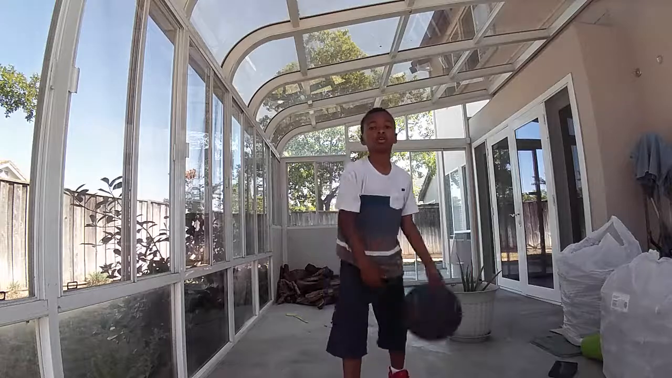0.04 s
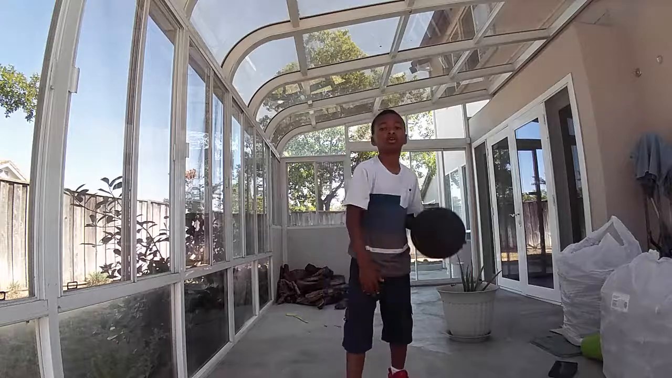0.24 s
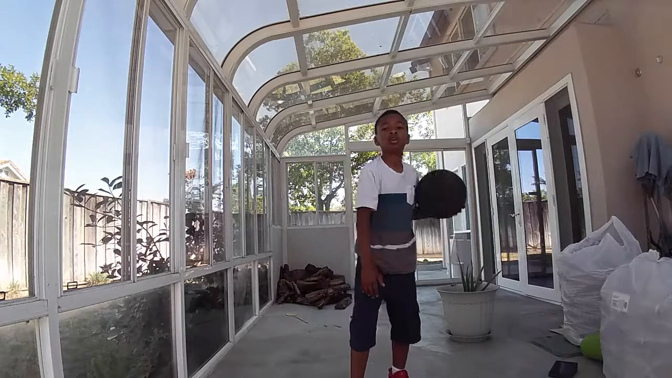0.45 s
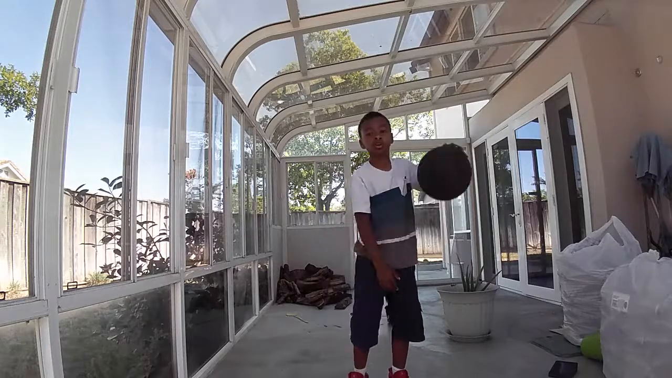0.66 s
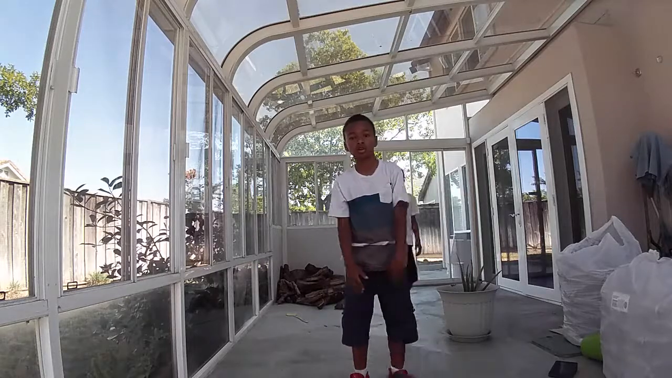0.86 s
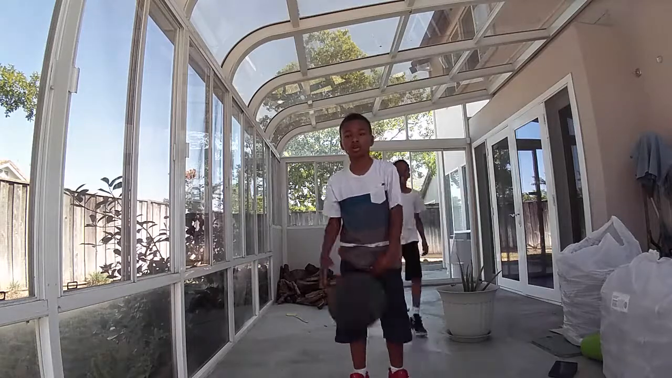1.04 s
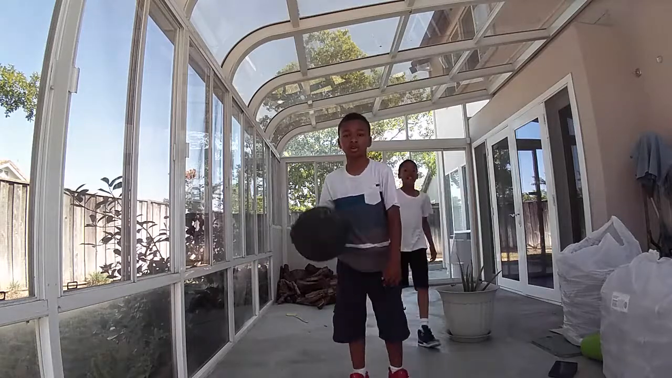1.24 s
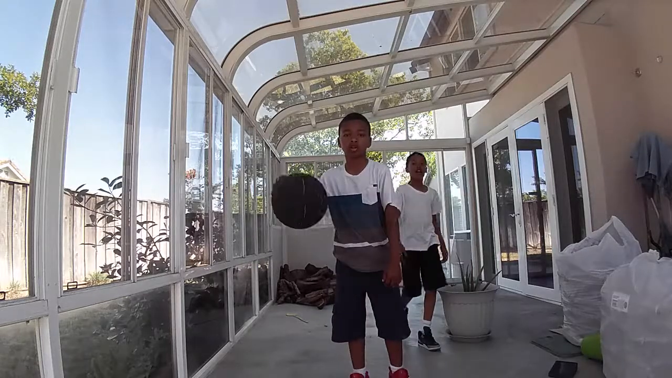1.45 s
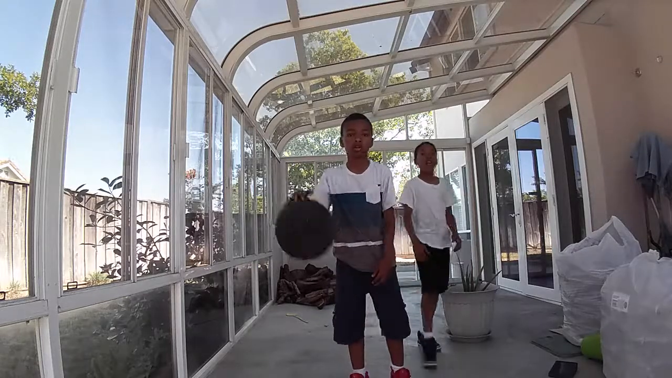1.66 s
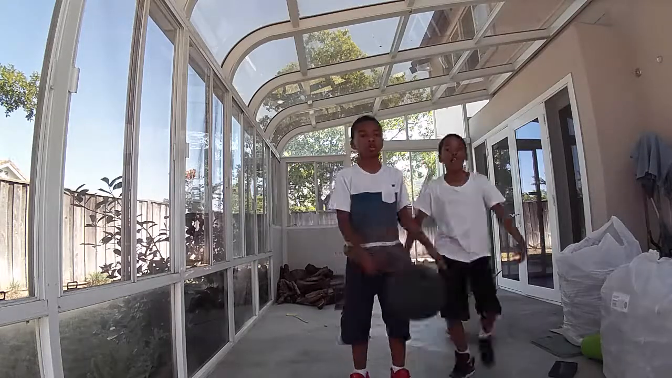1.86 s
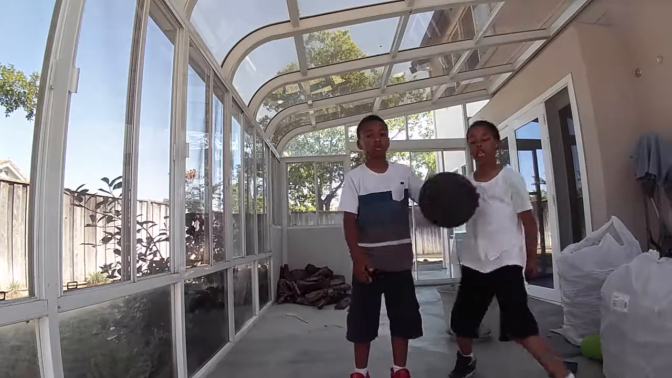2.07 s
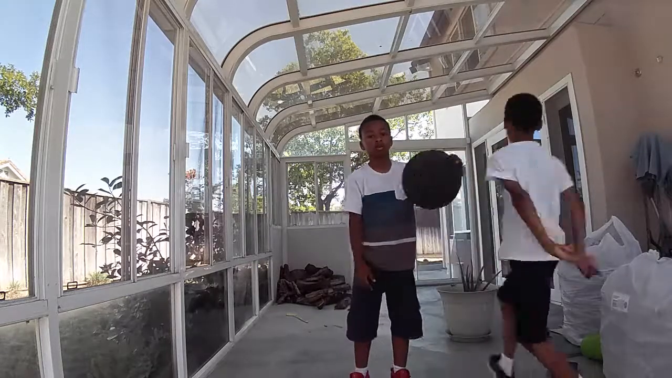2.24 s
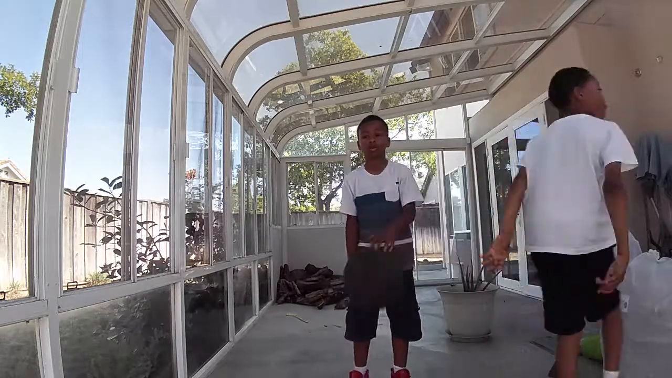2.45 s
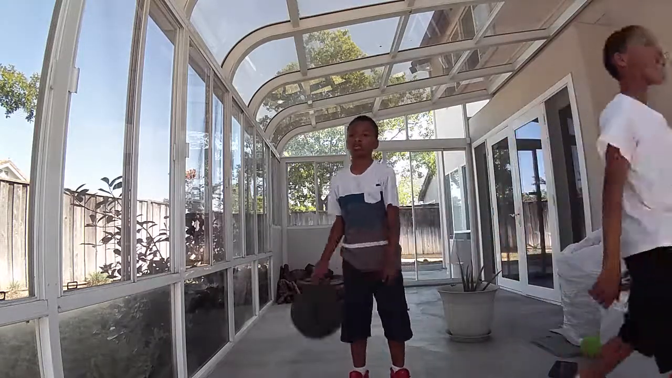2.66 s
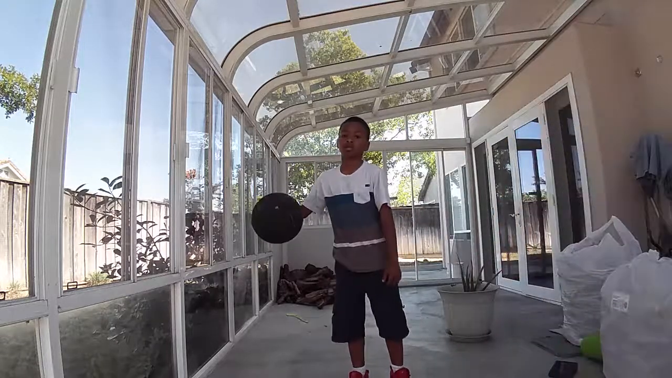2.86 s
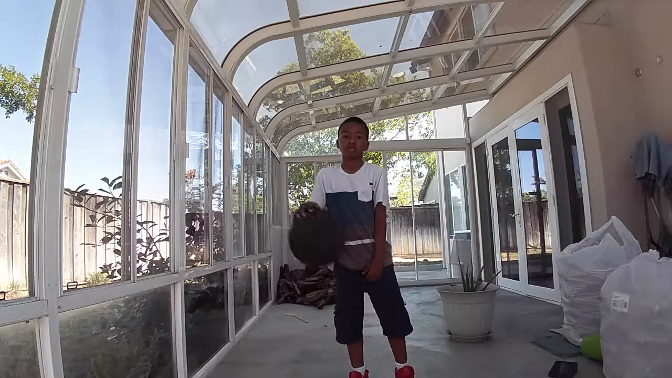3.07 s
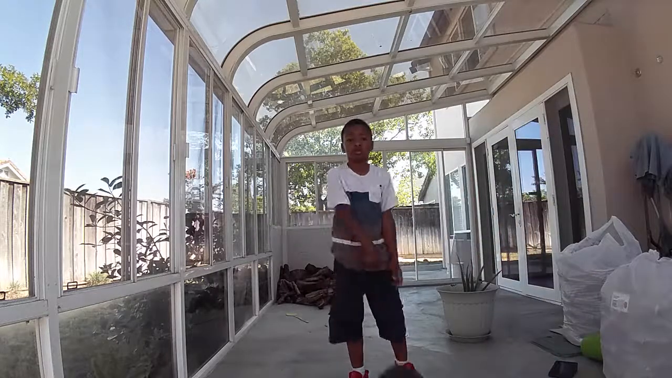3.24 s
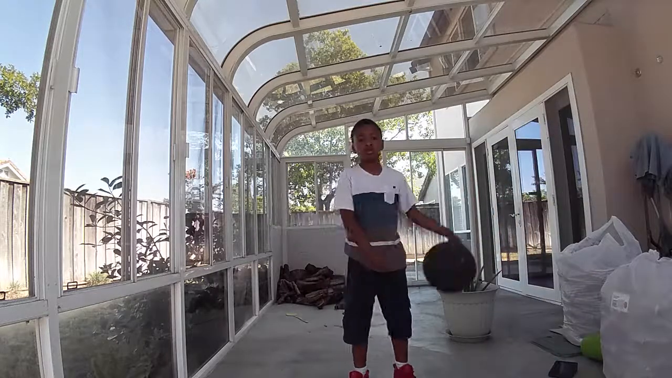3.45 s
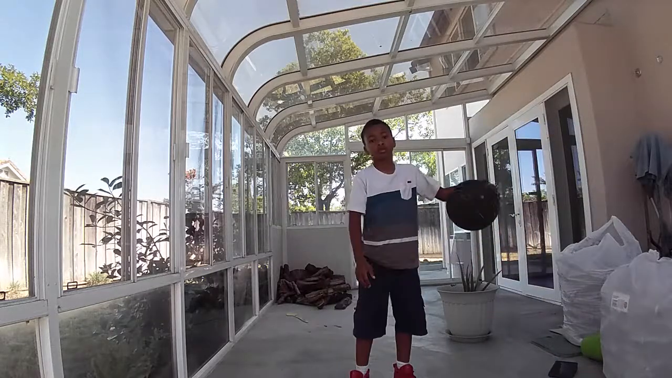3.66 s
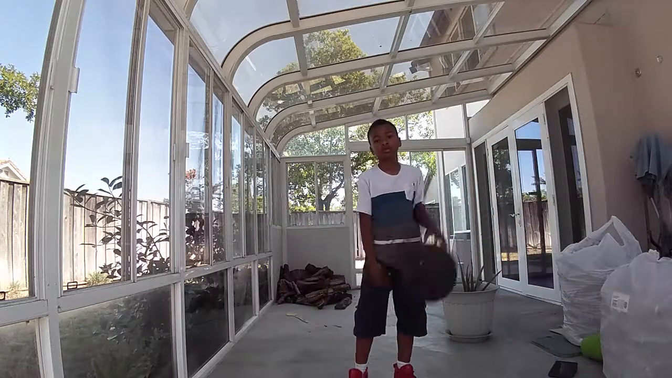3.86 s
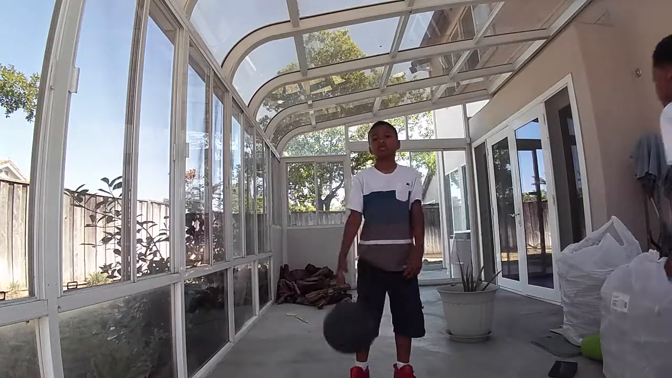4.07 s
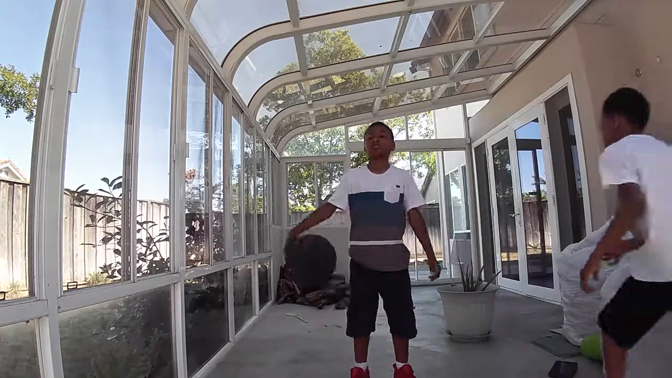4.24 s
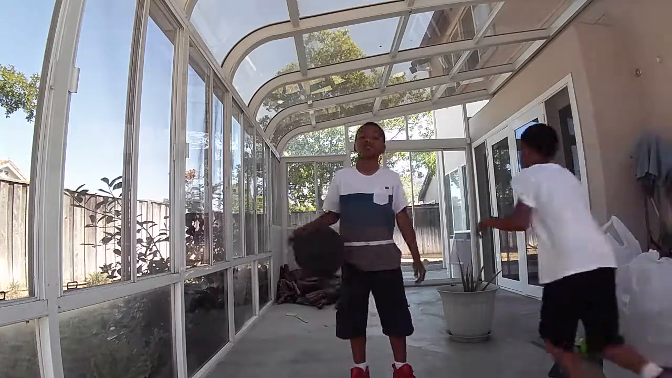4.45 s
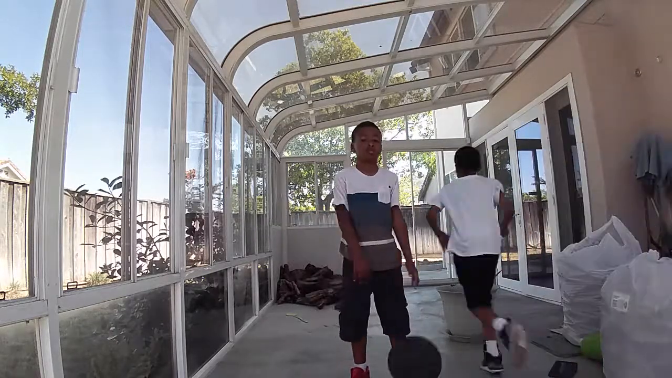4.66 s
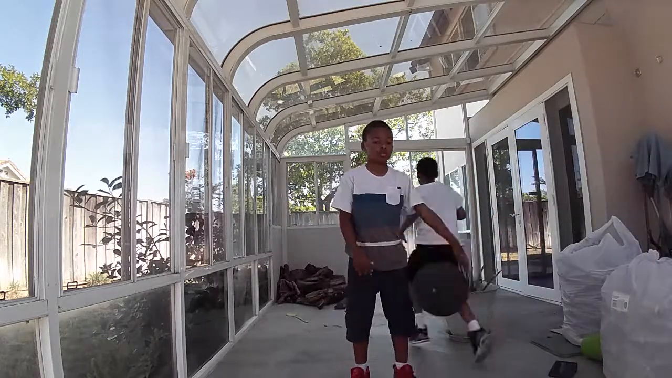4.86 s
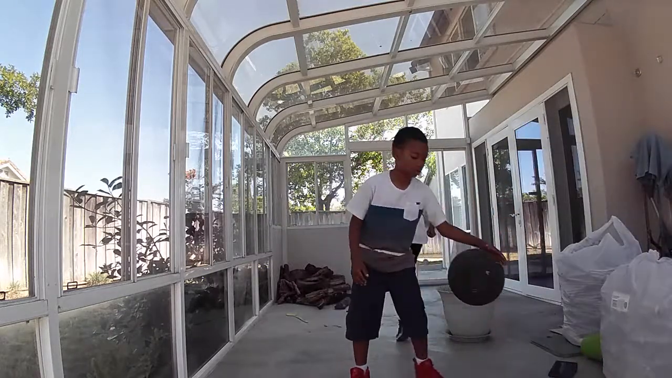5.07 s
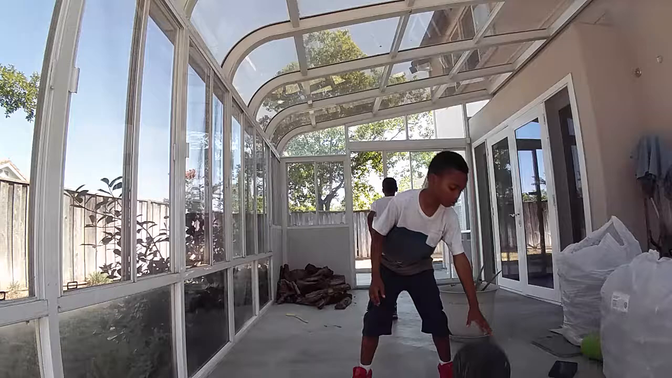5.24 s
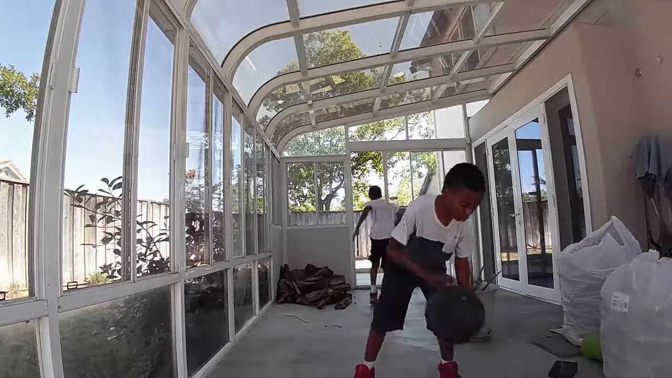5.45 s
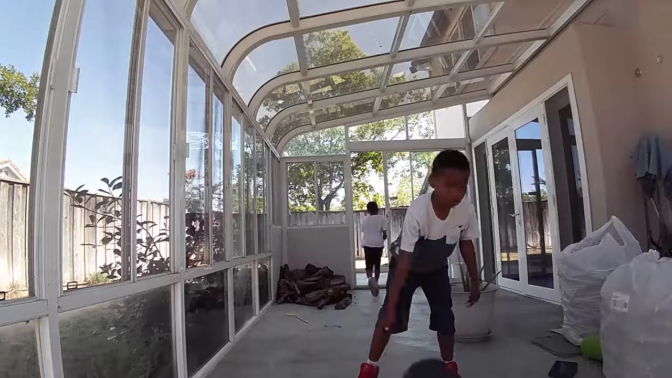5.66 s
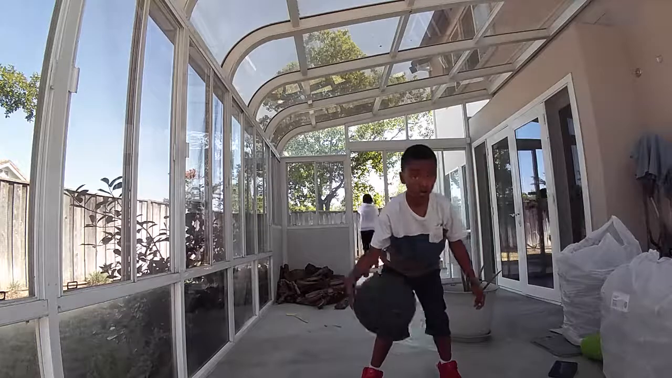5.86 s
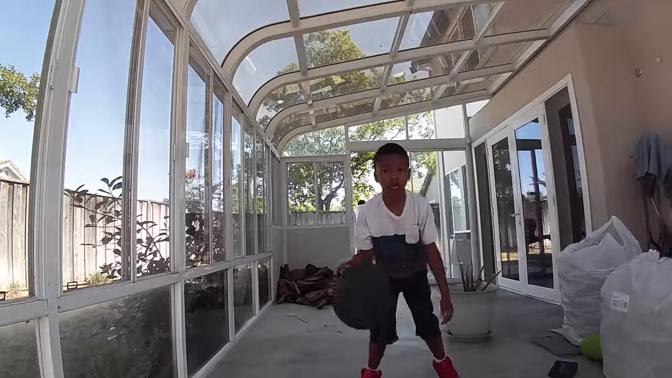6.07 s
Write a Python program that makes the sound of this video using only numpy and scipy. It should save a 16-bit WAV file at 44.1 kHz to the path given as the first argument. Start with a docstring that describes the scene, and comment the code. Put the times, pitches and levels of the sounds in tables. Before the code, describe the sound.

A basketball bounces on concrete in a narrow glass sunroom, close to a stereo camera microphone. Each hit is a bright double crack with a bassy thump and a short hollow ring, roughly every three quarters of a second, quickening at the end. Between hits, palms pat the rubber and shoes scuff the floor. Faint falling chirps occur early over a low steady rumble.

```python
"""Dribbling a basketball in a glass sunroom

A basketball is dribbled on the concrete floor of a narrow glass sunroom, close to a camera's two microphones.
Each bounce is a double crack, a slap of the rubber shell and a thump that sets the room's air modes booming.
Between bounces palms catch the ball crisply or push it down softly, and shoes scuff: short strokes are brighter.
Faint falling chirps come over a low steady rumble. Clicks, shaped noise and decaying sines make the sounds."""
import sys
import numpy as np
from scipy import signal
from scipy.fft import rfft, irfft, next_fast_len
from scipy.io import wavfile
from scipy.ndimage import uniform_filter1d

SR = 44100
rng = np.random.default_rng(int(sys.argv[2]) if len(sys.argv) > 2 else 0)


def inscribe(sig):
    """Save sig as 16-bit PCM at rate SR to the path in sys.argv[1].

    A 1-D sig is mono; a 2-D sig holds one channel per row.
    Samples are clipped to [-1, 1] before scaling.
    """
    pcm = np.round(np.clip(np.atleast_2d(sig).T, -1, 1) * 32767)
    wavfile.write(sys.argv[1], SR, pcm.astype(np.int16))


N = 269362

# ball on the floor: (time [s], slap level [dB, relative], treble [dB], shell resonance [Hz],
# height of that resonance [dB], height of the upper resonance [dB])
BOUNCE_HITS = [(-.085, -17.5, -2, 785, 8, 4), (0.8711, -15, -3, 959, 7, 4.5),
               (1.5923, -17, -6.5, 770, 5.5, 3), (2.4172, -16.5, -2, 714, 6, 3),
               (3.2393, -16.5, -2, 863, 9, 0.5), (3.978, -16, -2, 819, 4.5, 7),
               (4.661, -18.5, -4.5, 850, 3, 4.5), (5.2628, -20.5, -0.5, 944, 4.5, 3.5),
               (5.6396, -19, -3, 801, 7.5, 8)]
# spectrum of ball slaps: (frequency [Hz], level [dB per Hz, relative])
SLAP_SPECTRUM = [(100, -5), (200, -10), (300, -7.5), (410, -8), (495, -20.5), (600, -4), (850, -1),
                 (1230, -9), (1700, -15), (3000, -14.5), (5300, -17.5), (7300, -16.5), (12000, -23),
                 (16000, -35)]
# spectrum of soles on concrete: (frequency [Hz], level [dB per Hz, relative])
SCUFF_SPECTRUM = [(150, -16), (450, -18.5), (700, -1.5), (1600, -3), (3700, -5.5), (7100, -1.5),
                  (11000, -5.5), (16000, -12)]
# reverberation time of the glass room: (frequency [Hz], time to fall 60 dB [s])
ROOM_DECAY = [(150, 0.87), (400, 0.79), (850, 0.63), (2700, 0.75), (7000, 0.65), (11000, 0.51),
              (16000, 0.3)]

T = np.arange(SR) / SR  # time within one event [s]
HZ = np.fft.rfftfreq(SR, 1 / SR)


def amp(db):
    """Decibels to gain."""
    return 10 ** (np.asarray(db) / 20)


def unit(x):
    """x at rms 1."""
    return x / np.sqrt(np.mean(x ** 2) + 1e-20)


def along(points, hz):
    """(Hz, value) points read on a log frequency axis."""
    point_hz, values = np.transpose(points)
    return np.interp(np.log(hz + 1), np.log(point_hz + 1), values)


def add(track, s, sound):
    """Mix a sound into the track from time s on, cut off at either end of the track."""
    start = round(s * SR)
    part = sound[..., max(-start, 0):N - start]
    first = max(start, 0)
    track[:, first:first + part.shape[-1]] += part


def bell(centre_hz, octaves):
    """A bump of height 1 on the frequency axis."""
    return np.exp(-.5 * (np.log2((HZ + 1) / centre_hz) / octaves) ** 2)


def treble(corner_hz=3000):
    """A shelf that rises from 0 to 1 around the corner."""
    return HZ ** 4 / (HZ ** 4 + corner_hz ** 4)


def diffuse(colour_db, size=SR):
    """Coloured noise arriving from all sides at two close microphones, rms 1."""
    # left-right correlation of the noise, wide in the treble, nearly mono at the very top:
    # (frequency [Hz], correlation [-1 to 1])
    correlation = [(100, 0.9), (250, 0.94), (500, 0.91), (1000, 0.53), (2000, 0.4), (4000, 0.28),
                   (8000, 0.037), (13000, 0.9)]
    # balance of the two microphones: (frequency [Hz], left minus right [dB])
    lean = [(150, 1), (500, 0.5), (1000, 3), (2000, 3.1), (4000, 0.5), (8000, -4), (12000, 2.5)]
    hz = np.fft.rfftfreq(size, 1 / SR)
    turn = np.arccos(np.clip(along(correlation, hz), -1, 1)) / 2  # shares out mid and side
    mid, side = rfft(rng.standard_normal((2, size))) * [np.cos(turn), np.sin(turn)]
    balance = amp(np.outer([.5, -.5], along(lean, hz)))
    spectra = np.array([mid + side, mid - side]) * balance * amp(colour_db)
    return unit(irfft(spectra, size))


def reverberation(colour_db):
    """The glass room's answer to a click of this colour: each frequency dies at its own speed."""
    hz, t, z = signal.stft(diffuse(colour_db), SR, nperseg=256)
    decay = amp(-60 * t / along(ROOM_DECAY, hz)[:, None])
    return signal.istft(z * decay, SR, nperseg=256)[1][:, :SR]


def room_swell(colour_db, length):
    """A steady sound of this length fills the room, which then rings out; gain peaks at 1 on rms 1 noise."""
    hz, t, z = signal.stft(diffuse(colour_db), SR, nperseg=256)
    t60 = along(ROOM_DECAY, hz)[:, None]
    filled = 1 - amp(-60 * np.minimum(t, length) / t60) ** 2  # energy built up so far
    ring_out = amp(-60 * np.maximum(t - length, 0) / t60)
    gain = np.sqrt(filled / filled[:, -1:]) * ring_out
    return signal.istft(z * gain, SR, nperseg=256)[1][:, :SR]


def click(colour_db):
    """A causal impulse of this colour, energy 1: folding the cepstrum puts its energy first."""
    cepstrum = irfft(np.log(amp(colour_db) + 1e-6))
    fold = np.r_[1, np.full(SR // 2 - 1, 2), np.zeros(SR - SR // 2)]
    pulse = irfft(np.exp(rfft(cepstrum * fold)))
    return pulse / np.linalg.norm(pulse)


def ring(modes, scatter_db):
    """Damped modes struck together, each at a slightly new strength."""
    total = 0
    for hz, db, t60 in modes:
        strength = amp(db + scatter_db * rng.normal() - 60 * T / t60)
        total = total + strength * np.sin(2 * np.pi * hz * T)
    return total


def boom(rise=0.004, low_hz=65):
    """The room's low modes swell as the ball squashes; a high-pass keeps the deepest bass out of the boom."""
    # air modes of the room: (frequency [Hz], level [dB, relative], time to fall 60 dB [s])
    room_modes = [(57.5, -12.5, 0.8), (58.4, -4.5, 0.22), (69.34, -12.5, 0.53), (86, -6, 0.21),
                  (93.2, -22, 0.51), (100.2, -15.5, 0.37), (107, -34.5, 0.9), (126.2, -18.5, 0.52),
                  (137.6, -27, 0.6), (143.3, -26.5, 0.52), (152.8, -27, 0.57), (170, -70, 0.66),
                  (223.8, -25.5, 0.63), (236.8, -26.5, 0.9), (247.5, -33, 0.48), (284.2, -31.5, 0.73),
                  (358.5, -43, 0.97)]
    air = -ring(room_modes, scatter_db=3.0) * (1 - np.exp(-T / rise))
    return signal.sosfilt(signal.butter(6, low_hz, "high", fs=SR, output="sos"), air)


def background(db=-52):
    """Steady low rumble and faint hiss in the room, as shaped noise."""
    # background spectrum: (frequency [Hz], level [dB per Hz, relative])
    rumble = [(25, -52), (45, -16), (58, -16.5), (80, -9.5), (150, -23.5), (240, -18), (480, -40.5),
              (800, -23.5), (1600, -34), (6700, -43.5), (16000, -46)]
    return amp(db) * diffuse(along(rumble, np.fft.rfftfreq(N, 1 / SR)), size=N)


def chirps(waver_hz=120):
    """Thin, wavering whistles that glide down, blurred by the room."""
    # faint chirps: (time [s], length [s], start pitch [Hz], end pitch [Hz], level [dB, relative])
    calls = [(.66, 0.14, 5650, 4930, -67), (1.293, 0.12, 2230, 2060, -51), (1.315, 0.125, 2880, 2800, -57)]
    out = np.zeros((2, N))
    for s, length, start_hz, end_hz, db in calls:
        progress = np.clip(T / length, 0, 1)
        waver = unit(uniform_filter1d(rng.standard_normal(SR), size=150))
        pitch = start_hz + (end_hz - start_hz) * progress + waver_hz * waver
        swell = np.sqrt(progress * (1 - progress))
        tone = swell * np.sin(2 * np.pi * np.cumsum(pitch) / SR)
        room = reverberation(along(SCUFF_SPECTRUM, HZ))
        wet = signal.fftconvolve(tone[None], room, axes=1)[:, :SR]
        add(out, s, amp(db) * (tone + wet / np.std(wet[:, T < length])))
    return out


def slide(length, body_db, grit=0.29, edge=0.0066, direct_db=-5):
    """A sliding sole or palm makes a dense train of tiny slips that the room smears."""
    plain_s = 0.059  # a stroke this long has the plain spectrum
    treble_db_per_halving, plain_rise_s = 4, .011  # shorter is brighter; time constant of a plain stroke's swell
    stroke = np.clip(np.minimum(T, length + edge - T) / edge, 0, 1)
    treble_db = treble_db_per_halving * np.log2(plain_s / length)
    # body_db lifts the low middle
    colour = along(SCUFF_SPECTRUM, HZ) + treble_db * treble() + body_db * bell(650, octaves=0.66)
    grains = np.exp(grit * unit(uniform_filter1d(rng.standard_normal(SR), size=30)))
    slips = stroke * unit(grains * diffuse(colour))
    pressure = 1 - np.exp(-T / (plain_rise_s * (length / plain_s) ** 2))  # long strokes start gently
    return pressure * (amp(direct_db) * slips + room_swell(colour, length))


def scuffs():
    """Soles scrape the concrete, and once a palm rubs the hollow ball."""
    # soles sliding on concrete: (time [s], length [s], level [dB, relative])
    strokes = [(0.665, 0.29, -51), (1.09, 0.022, -43.5), (1.172, 0.19, -45.5), (1.466, 0.021, -35.5),
               (1.9, 0.069, -44.5), (2.1, 0.085, -43), (2.175, 0.065, -37.5), (2.851, 0.027, -23.5),
               (2.88, 0.037, -38.5), (3.113, 0.091, -42), (4.273, 0.037, -37.5), (4.628, 0.043, -29.5),
               (4.897, 0.026, -34), (5.079, 0.064, -41), (5.122, 0.018, -37.5), (5.14, 0.03, -30.5)]
    # one palm sliding on the ball: time [s], length [s], level [dB, relative]
    palm_rub = (1.453, 0.134, -38)
    out = np.zeros((2, N))
    for s, length, db in strokes:
        add(out, s, amp(db) * slide(length, body_db=0))
    s, length, db = palm_rub
    add(out, s, amp(db) * slide(length, body_db=24))  # the ball rings hollow under the palm
    return out


def rising(s):
    """The ball is on its way up when the nearest bounce lies behind it."""
    nearest = min((row[0] for row in BOUNCE_HITS), key=lambda hit: abs(hit - s))
    return nearest < s


def pats(wall_delay=0.02, smack_db=23, room_db=4.0):
    """A palm smacks the shell, which rings briefly and thuds; the nearest wall answers."""
    # palms meeting the ball: (time [s], slap level [dB, relative], shell resonance [Hz])
    touches = [(0.286, -46.5, 790), (.563, -64, 690), (0.845, -47.5, 930), (1.453, -43, 740),
               (1.899, -42.5, 1200), (3.109, -37.5, 1120), (3.784, -38, 1580), (3.957, -43, 1000),
               (4.297, -35.5, 866), (4.901, -39.5, 2440), (5.124, -38, 790), (5.447, -34, 1920)]
    catch_treble_db, push_treble_db = -0.5, -6.5  # a rising ball smacks the palm; a push is softer
    thud_db = 7  # relative to the slap level
    out = np.zeros((2, N))
    for s, slap_db, shell_hz in touches:
        treble_db = catch_treble_db if rising(s) else push_treble_db
        colour = along(SLAP_SPECTRUM, HZ) + 3 * bell(1550, octaves=0.35) + treble_db * treble()
        ringing = colour + 10 * bell(shell_hz, octaves=0.3)
        smack = amp(smack_db) * click(colour)
        shell = amp(10 - 60 * T / .04) * diffuse(ringing)
        room = amp(room_db) * reverberation(colour + 6 * bell(shell_hz, octaves=0.33))
        add(out, s, amp(slap_db) * (smack + shell + room))
        add(out, s + wall_delay, amp(slap_db - 1 - 60 * T / 0.089) * diffuse(ringing))
        add(out, s, amp(slap_db + thud_db) * boom())
    return out


def shell_tone(shell_hz, width_hz=24, t60=0.69):
    """The shell's narrow ring, which the room keeps alive after the slap."""
    narrow = -20 * np.log10(1 + ((HZ - shell_hz) / width_hz) ** 2)
    return diffuse(narrow) * amp(-60 * T / t60) * (1 - np.exp(-T / 0.0043))


def bounces(crack_delay=.0024, wall_delay=0.013, thump_db=1.5):
    """First contact, a sharper crack as the shell flattens, then wall echo, ringing and room."""
    # air cavity of the ball: (frequency [Hz], level [dB, relative], time to fall 60 dB before slap damping [s])
    cavity = [(959, -3, .5), (1615, -12, .5), (1767, -14, .5), (2153, -12, .5), (2993, -20, .5)]
    upper_hz = 1188  # the shell's upper resonance
    # a bounce duller than crisp knocks harder in the middle
    crisp_treble_db, knock_hz, knock_db_per_db = -2, 1760, 1.5
    # the dribble gets low and quick from here on [s], and quick bounces die sooner [dB per s]
    quick_from_s, easy_damping, quick_damping = 4.5, 5, 17
    out = np.zeros((2, N))
    typical_db = np.mean([row[1] for row in BOUNCE_HITS])
    for s, slap_db, treble_db, shell_hz, shell_db, upper_db in BOUNCE_HITS:
        knock_db = knock_db_per_db * (crisp_treble_db - treble_db)
        colour = along(SLAP_SPECTRUM, HZ) + treble_db * treble()
        colour += shell_db * bell(shell_hz, octaves=0.11)
        colour += upper_db * bell(upper_hz, octaves=0.23)
        colour += knock_db * bell(knock_hz, octaves=0.36)
        damping = quick_damping if s > quick_from_s else easy_damping
        slap = amp(slap_db - damping * T)

        contact = click(colour + 8 * bell(280, octaves=0.99))
        add(out, s, -slap * amp(24.0) * contact)
        crack = click(colour + 15 * treble())
        add(out, s + crack_delay, -slap * amp(21) * crack)
        grind = amp(2.5 - 60 * T / 0.029) * diffuse(colour + 7 * treble())  # rubber grinding on grit
        add(out, s, slap * grind)
        add(out, s + crack_delay, slap * amp(12.0 - 60 * T / 0.028) * diffuse(colour))  # body of the slap
        add(out, s + wall_delay, slap * amp(1.0 - 60 * T / 0.017) * diffuse(colour))
        room = reverberation(colour) * (1 - np.exp(-T / .007))
        add(out, s, slap * amp(5.5) * room)
        add(out, s, slap * amp(shell_db - 12.0) * shell_tone(shell_hz))
        add(out, s, slap * amp(-10) * ring(cavity, scatter_db=2))
        # the thump varies less than the slap
        add(out, s, amp(thump_db + 0.66 * (slap_db - typical_db)) * boom())
    return out


def scene():
    """Everything at the two microphones."""
    return background() + chirps() + scuffs() + pats() + bounces()


def record(dry):
    """The camera notches the treble, rounds off the highest peaks and ends at its band limit."""
    # notch of the microphone's sound ports: (frequency [Hz], level [dB])
    port_notch = [(7600, -0.5), (9000, -7.5), (10300, -2.5)]
    top_hz = 16000
    size = next_fast_len(N + SR // 2)
    hz = np.fft.rfftfreq(size, 1 / SR)
    heard = irfft(rfft(dry, size) * amp(along(port_notch, hz)), size)
    rounded = heard / (1 + np.abs(heard / .92) ** 8) ** (1 / 8)
    return irfft(rfft(rounded) * (hz < top_hz), size)[:, :N]


dry = scene()
out = record(dry)
inscribe(out)
```